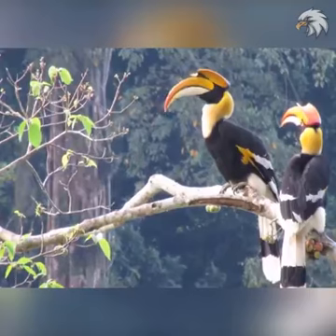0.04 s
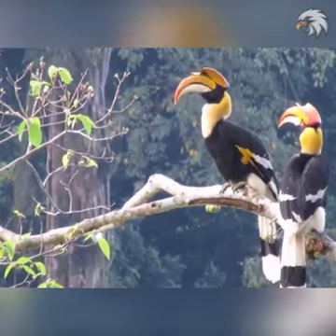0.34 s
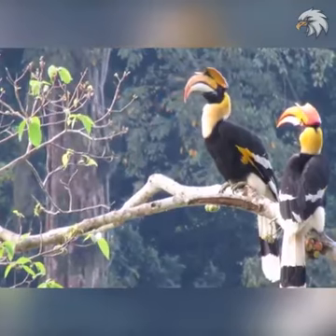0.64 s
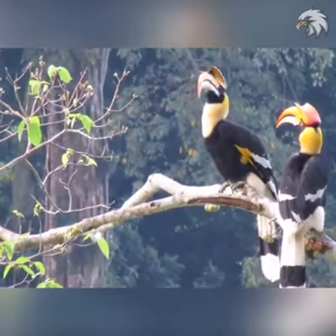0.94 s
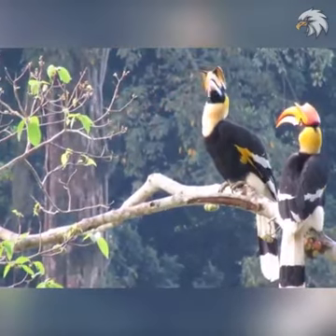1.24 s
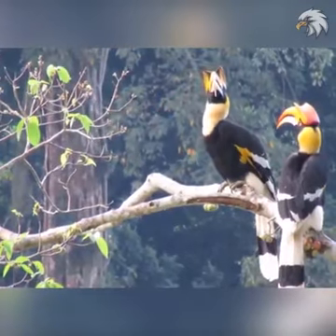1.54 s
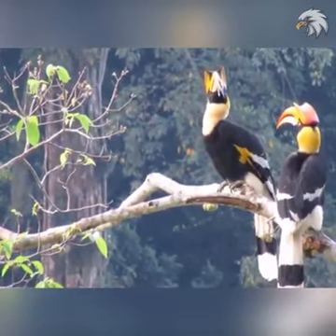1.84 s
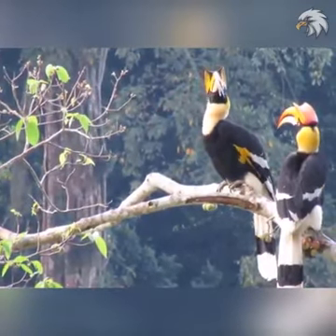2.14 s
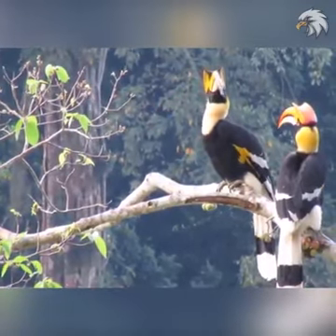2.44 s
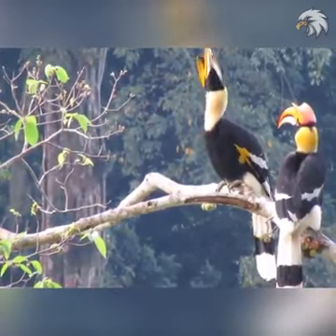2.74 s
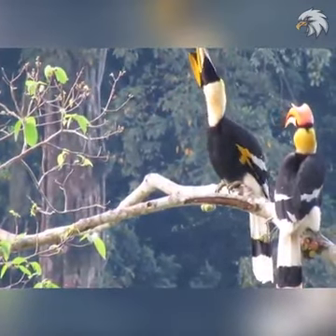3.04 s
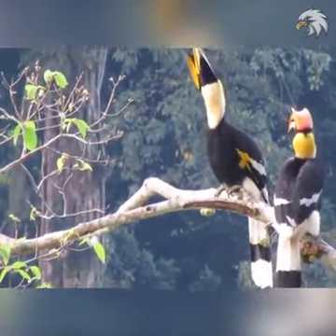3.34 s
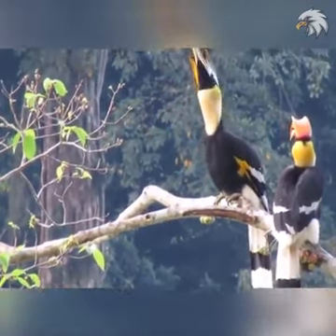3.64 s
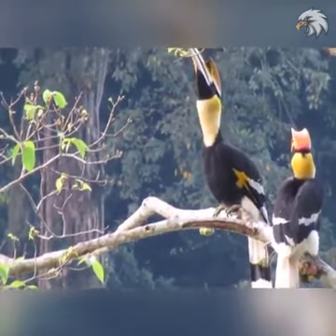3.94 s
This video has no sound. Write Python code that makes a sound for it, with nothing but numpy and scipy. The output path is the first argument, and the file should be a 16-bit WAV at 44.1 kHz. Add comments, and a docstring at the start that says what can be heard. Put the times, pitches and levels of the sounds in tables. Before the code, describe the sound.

Two sets of three rough hornbill barks, each short, long, short, ring across a forest clearing. Between them, nearby songbirds squeak, whistle and trill, with a faint pulsing insect and a soft hush of leaves behind.

```python
"""Small birds squeak and whistle nearby, then a great hornbill barks across a forest clearing:
three harsh calls (short, long, short), each a train of pulses ringing through its throat and bill.
A dry tap follows, and the songbirds fill the gap with gliding notes, squeaks and a trill of chips.
A high sizzle swells, a dull knock sounds, and near 2.9 s the hornbill barks its second phrase of three.
Throughout, the trees scatter every call over faint twitter, a pulsing insect and a steady forest hush."""
import sys
import numpy as np
from scipy import signal
from scipy.fft import rfft, irfft
from scipy.io import wavfile

SR = 44100
rng = np.random.default_rng(int(sys.argv[2]) if len(sys.argv) > 2 else 0)


def digitize_waveform(pressure):
    """Quantize a signal to 16-bit integers and store it at the path in sys.argv[1].

    Rows of a 2-D input are taken as channels; values are limited to [-1, 1].
    """
    field = np.atleast_2d(pressure).T
    bounded = np.clip(field, -1, 1)
    quanta = np.round(bounded * 32767).astype(np.int16)
    wavfile.write(sys.argv[1], SR, quanta)


N = 176400

# hornbill barks (start [s], length [s], top pitch [Hz], pitch sag [share], level [dB], roughness [0-1])
HORNBILL_BARKS = [(0.269, 0.11, 371.1, 0.16, -32, 0.26), (0.585, .23, 328, 0.2, -34.5, 0.59),
                  (0.906, 0.126, 376, 0.18, -32.5, 0.37), (2.868, 0.105, 372, 0.18, -32.5, 0.25),
                  (3.167, .24, 324.5, .19, -35, 0.56), (3.495, 0.13, 378.3, 0.2, -33, 0.45)]
# resonances of the hornbill's throat and bill (frequency [Hz], gain [dB])
THROAT_EQ = [(280, -16), (380, -27.5), (590, -4), (740, -13), (880, 2), (1100, 0.5), (1400, -10),
             (1750, -26.5), (1950, -13), (2250, -16), (2800, -34)]
# colour of the rasp in its voice (frequency [Hz], gain [dB])
RASP_EQ = [(70, -28.5), (420, -21.5), (630, -13.5), (1280, 0.5), (1750, -13), (3000, -12), (8000, -38)]
# clear songbird notes
# (start [s], length [s], first pitch [Hz], middle pitch [Hz], last pitch [Hz], level [dB], pan [dB])
SONG_NOTES = [(0.126, 0.04, 2944, 3380, 3410, -37, -3), (0.152, 0.093, 6840, 6080, 5600, -38, -1),
              (0.196, 0.029, 5050, 4764, 4630, -40.5, -1), (1.137, 0.06, 3710, 3966, 4240, -35, -1),
              (1.228, 0.057, 2954, 3044, 3290, -43.5, 0), (1.314, 0.011, 3520, 3820, 3500, -26.5, -8),
              (1.342, 0.016, 3610, 3670, 3610, -27.5, -8), (1.375, 0.02, 3687, 3640, 3590, -32.5, -18),
              (1.432, 0.035, 3624, 3410, 3240, -33.5, 10), (1.469, 0.017, 3480, 2925, 2650, -24, 1),
              (1.595, 0.075, 2472, 1900, 2714, -36, -5), (1.69, 0.024, 4240, 4070, 4180, -34.5, -2),
              (1.805, 0.066, 3560, 3785, 4090, -36.5, 3.5), (1.96, 0.039, 3130, 3924, 3820, -36.5, -1),
              (2.103, 0.029, 3285, 4290, 4050, -45, -14), (3.33, 0.18, 3354, 3845, 4040, -39, -2),
              (3.854, 0.0312, 7390, 6590, 6350, -34, -2)]
# harsh squeaks (start [s], length [s], first pitch [Hz], middle pitch [Hz], last pitch [Hz], level [dB])
BIRD_SQUEAKS = [(0.05, 0.073, 5190, 4820, 3530, -40.5), (0.536, 0.1, 4550, 3934, 3520, -43.5),
                (1.496, 0.056, 2984, 2850, 2680, -41.5), (1.713, 0.025, 5540, 3690, 2000, -29),
                (1.743, 0.031, 3314, 2830, 1800, -34), (2.718, 0.015, 3100, 5400, 3370, -27.5),
                (2.732, 0.038, 5185, 4017, 3855, -30), (3.492, 0.012, 3470, 3715, 4400, -33.5),
                (3.71, 0.028, 4060, 2884, 2710, -44), (3.919, 0.093, 4820, 5500, 4200, -48.5)]
# thin whistles
# (start [s], length [s], first pitch [Hz], middle pitch [Hz], last pitch [Hz], level [dB], pan [dB])
HIGH_WHISTLES = [(0.058, 0.31, 7480, 7880, 7700, -51, 0), (0.314, 0.05, 6860, 6680, 7750, -42.5, 0),
                 (0.4, 0.16, 8080, 7940, 8000, -48, -7), (0.808, 0.11, 7280, 7150, 7100, -41.5, 2.5),
                 (0.902, 0.13, 6920, 6800, 7090, -36.5, -2), (0.808, 0.32, 8280, 7890, 7680, -47.5, -2),
                 (0.986, 0.3, 7750, 7626, 7520, -37, -5), (2.633, 0.08, 7410, 7600, 7380, -44, 2),
                 (2.813, 0.033, 8030, 7870, 7770, -45, 1)]
# knocks of bill or twig (start [s], centre [Hz], width [Hz], decay [s], level [dB])
DRY_KNOCKS = [(1.037, 6200, 6800, 0.011, -38.5), (2.341, 740, 437, 0.013, -47)]
# fader ride of the high sizzle (time [s], level [dB])
SIZZLE_RIDE = [(0, -60), (2.329, -66.5), (2.39, -52.5), (3.05, -51.5), (3.15, -59), (4, -68.5)]
# colour of the forest hush (frequency [Hz], gain [dB])
HUSH_EQ = [(30, -23.5), (206, -12), (1350, -10.5), (2210, -2.5), (4410, -5), (5650, -6.5), (6710, -13.5),
           (7780, -23.5), (11000, -30.5)]
# stereo width of the hush (frequency [Hz], side gain [dB])
HUSH_WIDTH = [(500, -8.5), (2500, -2.5)]

BARK_ATTACK_S, ROUGH_SWELL_S, BARK_RELEASE_S, BARK_FADE_DB = 0.008, 0.028, 0.02, 7.5
SCOOP_S, SCOOP_DEPTH, SAG_CURVE = 0.03567, 0.1402, 1.4  # the pitch droops ever faster after the scoop
ROUGH_DECAY_S, JITTER, RASP_DB = 0.12, 0.062, -1.5  # roughness scales the jitter and the rasp
GROAN_LENGTH, GROAN_PITCH = 0.49, 0.84  # shares of the bark's
GROAN_RISE, GROAN_DB = 0.117, -7.5  # level against the bark, before roughness scales it
TRILL_START_S, CHIP_GAP_S, CHIP_SLOWING_S = 1.894, 0.0812, 0.00031
CHIP_S, CHIP_HZ, CHIP_DB = 0.0106, (2445, 2008, 1510), -39
TWITTER_HZ, TWITTER_S, TWITTER_BEND, TWITTER_DB = (2800, 6200), 0.035, 0.08, -56
BUZZ_START_S, BUZZ_EVERY_S, BUZZ_S, BUZZ_HZ, BUZZ_DB = 0.175, 0.49, 0.15, 5600, -54.5


def hornbill():
    """A dull groan rises into each bark, which starts rough, scoops up, then sags, clears and fades."""
    out = np.zeros((2, N))
    for start, length, top_hz, sag, db, rough in HORNBILL_BARKS:
        t = np.arange(int(length * SR)) / SR
        scoop = SCOOP_DEPTH * np.clip(1 - t / SCOOP_S, 0, 1) ** 2
        spent = np.maximum(t - SCOOP_S, 0) / (length - SCOOP_S)
        hz = top_hz * (1 - scoop - sag * spent ** SAG_CURVE)
        swell = gate(t, BARK_ATTACK_S + rough * ROUGH_SWELL_S, BARK_RELEASE_S)
        fade = undb(db - BARK_FADE_DB * t / length)
        grit = rough * (0.5 + np.exp(-t / ROUGH_DECAY_S))
        add(out, start, swell * fade * throat(hz, grit), pan_db=3)
        lead_s = GROAN_LENGTH * length
        lead_in = rough * undb(db + GROAN_DB) * groan(lead_s, GROAN_PITCH * top_hz)
        add(out, start + BARK_ATTACK_S - lead_s, lead_in)
    return forest(out, near_db=-5, near_s=0.046, far_db=-7, far_t60=1.92, spread=0.16)


def throat(hz, rough):
    """Pulses through the throat; roughness shakes their rate and size and adds a rasp once a cycle."""
    n = len(hz)
    shaken_hz = hz * (1 + rough * JITTER * band(n, 0, 211.4))
    phase = 2 * np.pi * np.cumsum(shaken_hz) / SR
    lags = rng.uniform(0, 2 * np.pi, size=10)
    voiced = sum(gain_at(THROAT_EQ, k * hz) * np.cos(k * phase + lag) for k, lag in enumerate(lags, 1))
    rasp = unit(colour(rng.standard_normal(n) * (1 + np.cos(phase)), RASP_EQ))
    shudder = 1 + rough * band(n, 69, 120) / 2
    return unit(voiced) * shudder + rough * undb(RASP_DB) * rasp


def groan(length, centre_hz):
    """A soft rising tone from the same throat, with its top rolled off."""
    t = np.arange(int(length * SR)) / SR
    voice = throat(centre_hz * (1 + GROAN_RISE * (t / length - 0.5)), rough=0.24)
    muffled = unit(colour(voice, [(850, -11.5), (1150, -21)]))
    return gate(t, length / 2, BARK_ATTACK_S) * muffled


def songbirds():
    """Clear gliding notes over a faint twitter, spread wide by the trees."""
    out = twitter()
    for start, length, *pitches, db, pan_db in SONG_NOTES:
        note = glide(length, pitches, waver=0.011, flutter=0.25, attack=0.24, release=0.17)
        add(out, start, undb(db) * note, pan_db)
    return forest(out, near_db=-1.5, near_s=0.028, far_db=-7, far_t60=1.0, spread=1.05)


def glide(length, pitches, waver, flutter, attack, release):
    """A near-pure bird note bending through three pitches; attack and release are shares of its length."""
    t = np.arange(int(length * SR)) / SR
    contour_hz = np.polyval(np.polyfit([0, 0.5, 1], pitches, 2), t / length)
    hz = contour_hz * (1 + waver * band(len(t), 0, 400))
    phase = 2 * np.pi * np.cumsum(hz) / SR
    tone = np.sin(phase) + undb(-28) * np.sin(2 * phase)
    tremolo = np.exp(flutter * band(len(t), 71, 170))
    return unit(tone * tremolo) * gate(t, attack * length, release * length)


def squeaks():
    """Rough, mostly falling squeaks with a bright scratch, splashing off the trees."""
    out = np.zeros((2, N))
    for start, length, *pitches, db in BIRD_SQUEAKS:
        tone = glide(length, pitches, waver=0.06, flutter=0.5, attack=0.095, release=0.13)
        swell = gate(np.arange(len(tone)) / SR, attack_s=0.006, release_s=0.004)
        envelope = np.abs(signal.hilbert(tone))
        scratch = envelope * band(len(tone), 1.4 * pitches[1], 4000)
        add(out, start, undb(db) * swell * (tone + undb(-18.5) * scratch))
    thinned = colour(out, [(1200, -26), (2300, 0)])
    return forest(thinned, near_db=3.5, near_s=0.032, far_db=-4, far_t60=0.79, spread=1.06)


def whistles():
    """Thin, high bird whistles with a fast quiver."""
    out = np.zeros((2, N))
    for start, length, *pitches, db, pan_db in HIGH_WHISTLES:
        whistle = glide(length, pitches, waver=0.00805, flutter=0.33, attack=0.17, release=0.13)
        add(out, start, undb(db) * whistle, pan_db)
    return forest(out, near_db=-5, near_s=0.019, far_db=-17, far_t60=0.7, spread=0.5)


def trill(count=10):
    """A run of quick falling chips that slows a little."""
    out = np.zeros((2, N))
    for k in range(count):
        start = TRILL_START_S + CHIP_GAP_S * k + CHIP_SLOWING_S * k ** 2
        chip = glide(CHIP_S, CHIP_HZ, waver=0, flutter=0, attack=0.25, release=0.8)
        add(out, start, undb(CHIP_DB + rng.normal()) * chip, pan_db=-4.5)
    return forest(out, near_db=-12, near_s=0.04, far_db=-3, far_t60=0.9, spread=0.9)


def knocks():
    """Dry taps of bill or twig: noise bursts that die away fast."""
    out, t = np.zeros((2, N)), np.arange(SR // 10) / SR
    for start, hz, width_hz, decay_s, db in DRY_KNOCKS:
        add(out, start, undb(db) * np.exp(-t / decay_s) * band(len(t), hz, width_hz))
    return out


def insects():
    """One insect buzzes twice a second over a high, flickering sizzle."""
    out, t = np.zeros((2, N)), np.arange(int(BUZZ_S * SR)) / SR
    swell = gate(t, BUZZ_S / 2, BUZZ_S / 2)
    for start in np.arange(BUZZ_START_S, N / SR, BUZZ_EVERY_S):
        add(out, start, undb(BUZZ_DB) * swell * band(len(t), BUZZ_HZ, 150))
    ride_db = np.interp(np.arange(N) / SR, *np.array(SIZZLE_RIDE).T)
    flicker_db = 3 * band(N, 0, 30)
    add(out, 0, undb(ride_db + flicker_db) * band(N, 8040, 1880))
    return out


def twitter(count=36):
    """Faint chirps of many distant birds, scattered at random."""
    out = np.zeros((2, N))
    for when, height, bend in rng.random((count, 3)):
        centre_hz = np.interp(height, [0, 1], TWITTER_HZ)
        slide = TWITTER_BEND * (2 * bend - 1)
        pitches = centre_hz * np.array([1 - slide, 1, 1 + slide])
        chirp = glide(TWITTER_S, pitches, waver=0.02, flutter=0.5, attack=0.5, release=0.5)
        add(out, when * N / SR, undb(TWITTER_DB) * chirp)
    return out


def hush(level_db=-48.5):
    """A bed of distant leaves and insects, gently swelling, wider in the treble."""
    mid, side = colour(rng.standard_normal((2, N)), HUSH_EQ)
    side = colour(side, HUSH_WIDTH)
    swell_db = 0.2 * band(N, 0, 2.3)
    return undb(level_db + swell_db) * unit(np.array([mid + side, mid - side]))


def forest(x, near_db, near_s, far_db, far_t60, spread):
    """Forest reverb: quick scatter from nearby trunks and a long tail from the far trees."""
    t = np.arange(SR) / SR
    mid, side = rng.standard_normal((2, SR))
    trunks = np.exp(-t / near_s) * (rng.random(SR) < 0.02) * (t > 0.002)  # sparse early reflections
    tail = undb(-60 * t / far_t60) * (1 - np.exp(-t / 0.03))
    decay = (undb(near_db) * unit(trunks) + undb(far_db) * unit(tail)) / np.sqrt(SR * (1 + spread ** 2))
    impulse = decay * np.array([mid + spread * side, mid - spread * side])
    return x + signal.fftconvolve(x.mean(axis=0)[None], impulse, axes=1)[:, :N]


def undb(db):
    return 10 ** (np.asarray(db) / 20)


def unit(x):
    return x / np.sqrt(np.mean(x ** 2) + 1e-20)


def gain_at(points, hz):
    """Linear gain read off an EQ curve (frequency [Hz], gain [dB])."""
    f, db = np.array(points, float).T
    return undb(np.interp(np.log(hz + 1), np.log(f), db))


def colour(x, points):
    """Filter by an EQ curve (frequency [Hz], gain [dB])."""
    return irfft(rfft(x) * gain_at(points, np.fft.rfftfreq(x.shape[-1], 1 / SR)), x.shape[-1])


def band(n, hz, width_hz):
    """Noise in a bell-shaped band; centred on zero it is a random wobble."""
    f = np.fft.rfftfreq(n + 8192, 1 / SR)
    bell = np.exp(-2 * ((f - hz) / width_hz) ** 2)
    return unit(irfft(rfft(rng.standard_normal(2 * len(f) - 2)) * bell))[:n]


def gate(t, attack_s, release_s):
    """Smooth attack, hold and release."""
    fade_in = np.sin(np.pi / 2 * np.clip(t / attack_s, 0, 1))
    fade_out = np.sin(np.pi / 2 * np.clip((t[-1] - t) / release_s, 0, 1))
    return fade_in * fade_out


def add(out, start, x, pan_db=0):
    """Place a sound on the timeline; pan is the left level minus the right."""
    i = max(int(start * SR), 0)
    x = x[:max(N - i, 0)]
    out[:, i:i + len(x)] += x * undb(np.array([[pan_db], [-pan_db]]) / 2)


def scene():
    return hornbill() + songbirds() + trill() + squeaks() + whistles() + insects() + knocks() + hush()


def record(dry):
    """A steep low-pass takes the air off the mix."""
    top_hz = 11050
    return signal.sosfilt(signal.ellip(10, 0.2, 80, top_hz, fs=SR, output="sos"), dry)


dry = scene()
out = record(dry)
digitize_waveform(out)
```